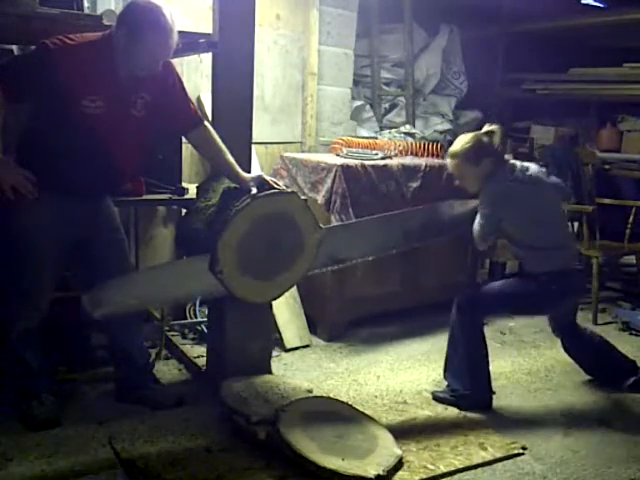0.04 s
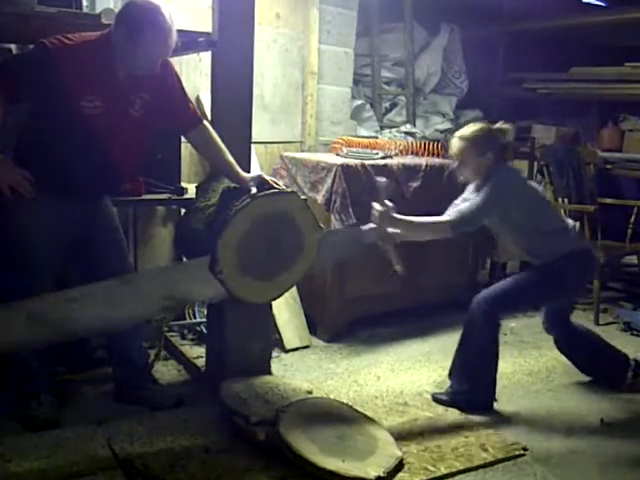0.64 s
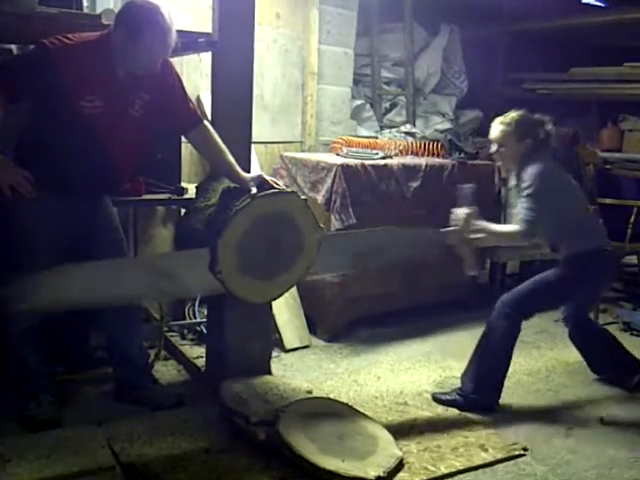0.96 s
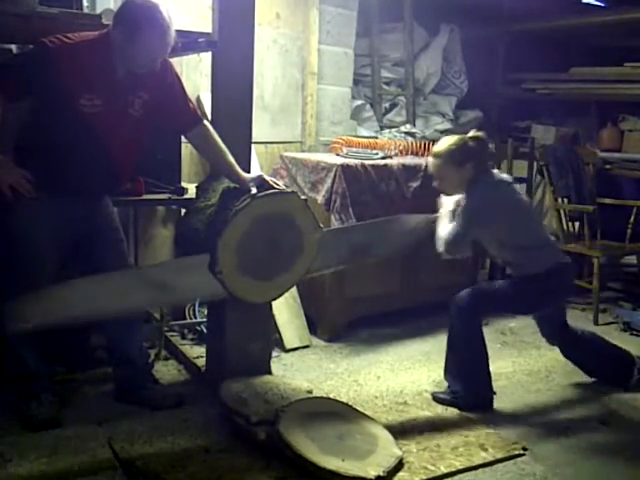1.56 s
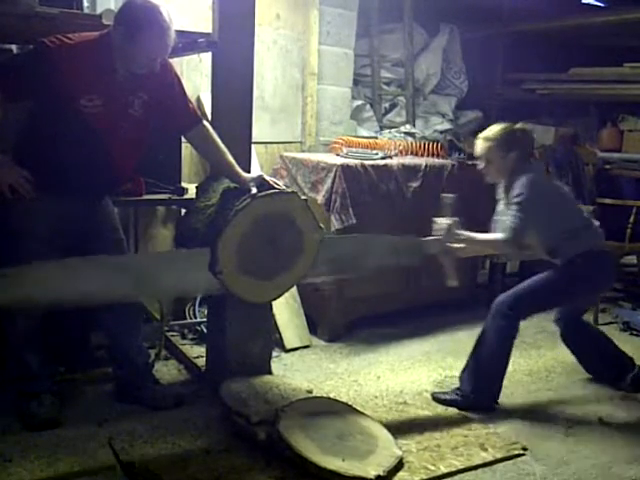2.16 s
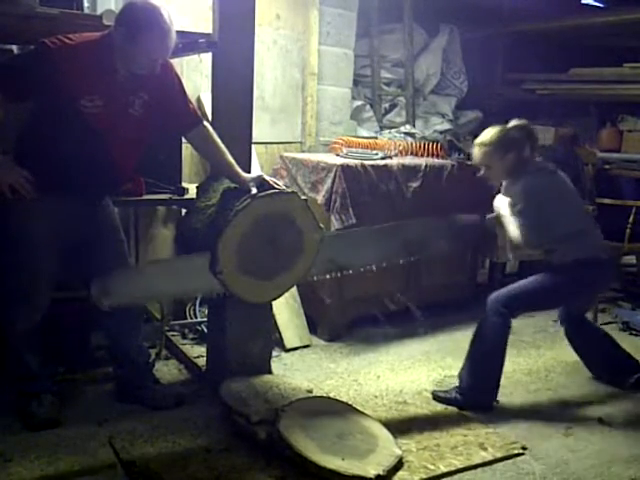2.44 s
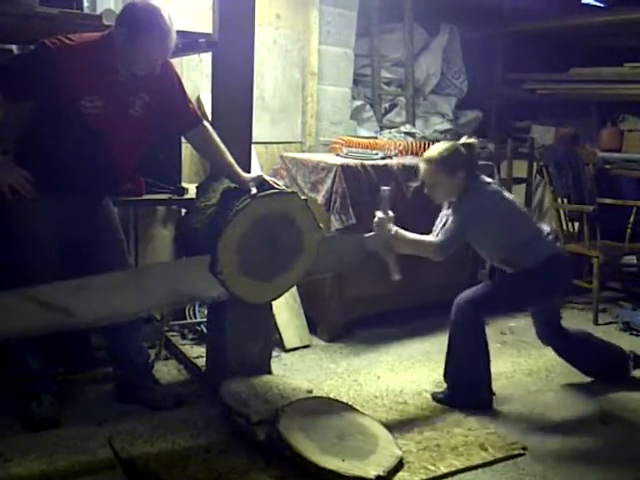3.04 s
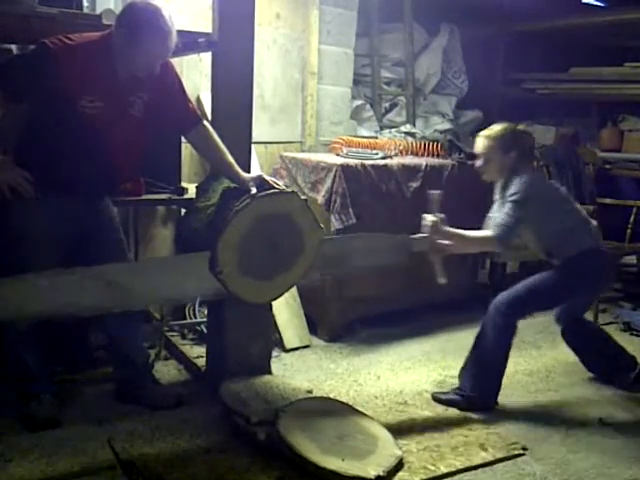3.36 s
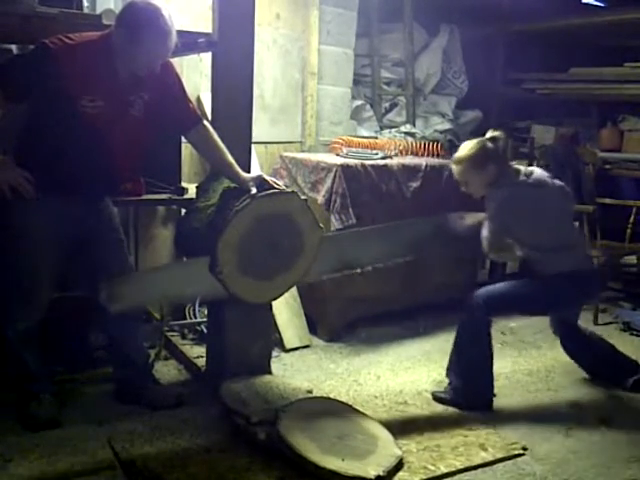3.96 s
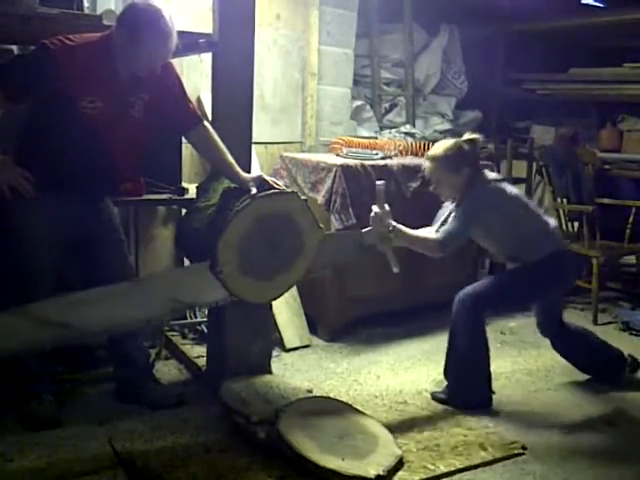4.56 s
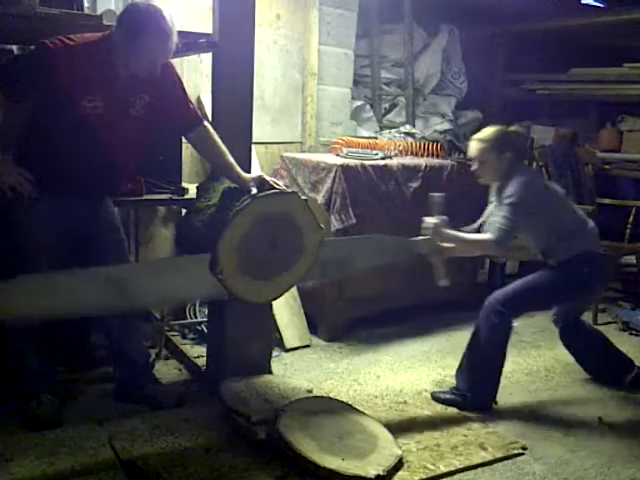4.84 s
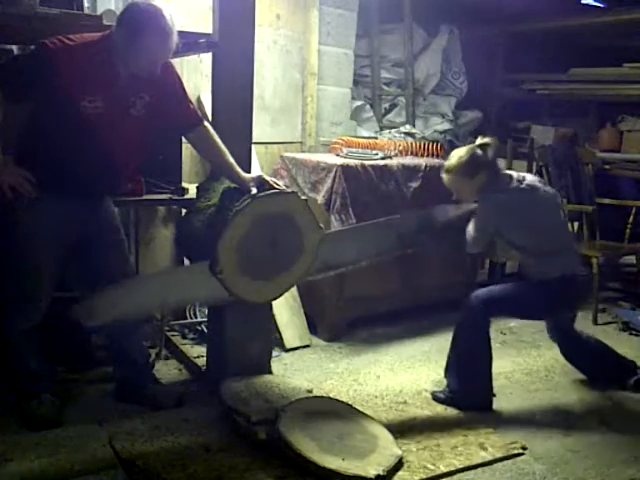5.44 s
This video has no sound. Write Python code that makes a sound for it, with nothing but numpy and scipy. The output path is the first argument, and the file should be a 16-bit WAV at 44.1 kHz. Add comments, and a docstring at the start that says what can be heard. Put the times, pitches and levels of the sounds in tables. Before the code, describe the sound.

A long hand saw rasps back and forth through a log in eight steady strokes inside a workshop.

```python
"""Crosscut saw in a workshop

A long saw is pushed and pulled through a log, eight strokes. Each time the blade speeds up, skates
lightly, then bites in and tears fibres until it slows to turn round. A floor reflection and a few ringing
tones colour the rasp, which surges mid-stroke. Now and then a thick fibre snaps, the log groans, the loose
blade sings or the stand shudders; the blade rattles in the kerf at the end. A faint hum lies under it."""
import sys
import numpy as np
from scipy import signal
from scipy.fft import rfft, irfft
from scipy.io import wavfile
from scipy.ndimage import uniform_filter1d

SR = 44100
rng = np.random.default_rng(int(sys.argv[2]) if len(sys.argv) > 2 else 0)


def pcm_store(signal):
    """Save signal as 16-bit PCM."""
    levels = np.round(np.clip(np.atleast_2d(signal), -1, 1) * 32767)
    wavfile.write(sys.argv[1], SR, levels.astype(np.int16).T)


N = 242550
TIME = np.arange(N) / SR

# push and pull in turn: start/s, end/s, speed-up/s, slow-down/s, bite time/s, cutting force/dB,
# skating force relative to cutting/dB, load on the log as bass gain/dB
STROKES = [(0.03, 0.87, 0.2, 0.39, 0.27, -24.2, -4.1, -15.5),
           (0.84, 1.43, 0.11, 0.28, 1.0, -20.8, -5.7, -20.2),
           (1.4, 2.13, 0.22, 0.21, 1.58, -26.5, -2.3, -16.8),
           (2.11, 2.66, 0.12, 0.3, 2.31, -21.2, -2.2, -18.3),
           (2.71, 3.33, 0.15, 0.26, 2.87, -22.4, -3.7, -18.7),
           (3.36, 3.99, 0.08, 0.22, 3.51, -23.8, -3.6, -17.5),
           (3.93, 4.85, 0.31, 0.47, 4.27, -24.7, -3.5, -16.9),
           (4.82, 5.4, 0.1, 0.31, 4.98, -19.0, -6.6, -19.1)]
# short changes in loudness and hiss during a stroke, mostly surges, one brief bright dip:
# middle/s, length/s, gain/dB, hiss gain/dB
STROKE_ACCENTS = [(0.648,0.42,5,2.5), (1.028,0.073,-3,3.5), (1.14,0.095,0.5,1.8), (1.67,0.14,3,2.8),
                  (1.874,0.58,5.5,-0.2), (2.288,0.089,4.5,2.8), (2.42,0.06,3,-0.8), (3.082,0.16,0.8,3.5),
                  (3.758,0.46,4.5,-1), (4.362,0.23,3,1.6), (4.613,0.42,7.5,1.2)]
# EQ of tearing wood: f/Hz, gain/dB
RASP_EQ = [(60, -22), (200, -22), (330, -11.5), (480, -13), (740, -9), (950, -6.5), (1600, -4), (2400, 1.5),
           (3200, 1), (3850, 1.5), (4500, -3), (5400, -4.5), (7050, -7.5), (8000, -20.5)]
# broad, evenly spaced peaks of a floor reflection, plus a few narrow ringing tones:
# f/Hz, width/Hz, relative level/dB
RASP_PEAKS = [(535, 84, 6.5), (870, 8.8, -4), (929, 74, -5), (994, 25, -4.5), (1156, 40, -2), (1412, 62, 2),
              (1820, 50, -3.5), (2410, 12, -6.5), (3504, 19, -9)]
# thick fibres break: t/s, dry peak level/dB
FIBRE_SNAPS = [(1.170, -11), (1.197, -16.5), (2.431, -12), (3.772, -10.5)]
# the blade knocks in the kerf after the last stroke: t/s, dry peak level/dB
KERF_KNOCKS = [(5.469, -24), (5.472, -22), (5.481, -22.5), (5.486, -25), (5.494, -27)]
# ring of one knock: f/Hz, relative level/dB, t60/s
KNOCK_MODES = [(540, -7, 0.3), (1040, -7, 0.073), (1390, -2, 0.083), (1880, -8, .02), (2120, 11, 0.023),
               (2660, 10, 0.027), (3080, -8, .02)]
# log and blade sing under the teeth: middle/s, length/s, f/Hz, level/dB
GROAN_NOTES = [(0.548, 0.078, 525, -31), (0.646, 0.083, 570, -38), (0.757, 0.38, 371, -51.5),
               (1.947, 0.25, 261, -52.5), (2.059, 0.67, 371.5, -50), (2.384, 0.27, 551, -40.5),
               (3.657, 0.07, 425, -36.5), (3.66, 0.093, 531, -38), (4.519, 0.1, 521, -39),
               (5.075, 0.34, 532, -41)]
# the stand shudders: middle/s, length/s, level/dB
STAND_SHUDDERS = [(0.339, 0.25, -46), (1.198, 0.23, -60)]
# EQ of the stand's rumble: f/Hz, gain/dB
STAND_EQ = [(10, -23.5), (22, 1), (40, -8), (150, -2.5), (310, 4), (450, -2), (800, -20), (3000, -73)]
# EQ of the room tone: f/Hz, gain/dB
ROOM_TONE_EQ = [(10, -27), (34, -9.5), (50, -1), (90, -10), (135, -0.5), (200, -4.5), (500, -8),
                (2000, -5.5), (7000, -25)]
# reverb time of the workshop: f/Hz, t60/s
ROOM_DECAY = [(150, 1), (600, 0.088), (2500, 0.49), (7000, 0.44)]

BITE_IN_S = 0.0046  # time constant of the change from skating to cutting
FRESH_S, FRESH_HISS_DB = 0.092, 1.3  # a fresh bite is brighter, then the gullets fill with dust
HISS_SLOW_DB, BASS_SLOW_DB = -4, 3.1  # a blade near rest sounds duller and heavier
BASS_PER_ACCENT = -0.52  # dB of bass share per dB of accent: the bass follows an accent only in part
TURN_DB, TURN_SPEED = -40, .25  # floors of force and speed: the blade still shifts as it turns round


def sawing(log_hz=700, wood_hz=2300, hiss_hz=4500,
           log_db=-4.5, wood_db=-9.5, steel_db=-7.5, hiss_db=-9.0):
    """The cut in four bands: force sets the loudness, a sharp bite adds hiss, load adds the log's bass."""
    speed, force_db, bite_db, load_db = arm_motion()
    cut = coloured_rasp(wood_grain(teeth(speed)))
    below = lambda hz: signal.sosfiltfilt(signal.butter(4, hz, fs=SR, output="sos"), cut)
    log = amp(log_db + load_db) * unit(below(log_hz))
    wood = amp(wood_db) * unit(below(wood_hz) - below(log_hz))
    steel = amp(steel_db) * unit(below(hiss_hz) - below(wood_hz))
    hiss = amp(hiss_db + bite_db) * unit(cut - below(hiss_hz))
    return amp(force_db) * (log + wood + steel + hiss)


def arm_motion():
    """Each stroke speeds up, skates, bites in and slows: envelopes for speed, force, hiss and bass."""
    speed, drag, fresh = np.zeros((3, N))
    for start, end, rise, slow, bite_at, cut_db, skate_db, _ in STROKES:
        motion = ease((TIME - start) / rise) * ease((end - TIME) / slow)
        cutting = .5 + .5 * np.tanh((TIME - bite_at) / BITE_IN_S)
        speed += motion
        drag += motion * amp(cut_db + skate_db * (1 - cutting))
        fresh += motion * cutting * np.exp(-np.maximum(TIME - bite_at, 0) / FRESH_S)
    speed = np.clip(speed, TURN_SPEED, 1)
    accent_db, sharp_db = sum(np.outer(gains_db, swell(middle, length))
                              for middle, length, *gains_db in STROKE_ACCENTS)
    force_db = 20 * np.log10(np.hypot(drag * amp(accent_db), amp(TURN_DB)))
    bite_db = sharp_db + FRESH_HISS_DB * fresh + HISS_SLOW_DB * (1 - speed)
    middles = [(start + end) / 2 for start, end, *_ in STROKES]
    stroke_load_db = np.interp(TIME, middles, [stroke[-1] for stroke in STROKES])
    load_db = stroke_load_db + BASS_SLOW_DB * (1 - speed) + BASS_PER_ACCENT * accent_db
    return speed, force_db, bite_db, load_db


def teeth(speed, teeth_per_s=120, uneven=.3, release_teeth=5.1, tooth_db=0.27,
          fibres_per_s=11000, fibre_db=1.16):
    """Each passing tooth tears a clump of fibres; the side of the blade rubs smoothly."""
    passed = np.cumsum(teeth_per_s * speed * np.exp(uneven * wander(60))) / SR
    depth = amp(tooth_db * rng.standard_normal(N))[passed.astype(int) % N]  # each tooth has its own
    grip = depth * np.exp(-(passed % 1) / release_teeth)  # a tooth catches at once and lets go slowly
    size = amp(fibre_db * np.minimum(rng.exponential(1, N), 4)) * rng.choice([-1, 1], N)
    torn = rng.random(N) < fibres_per_s * speed / SR
    fibres = size * torn / speed ** 0.42  # slow teeth tear fewer, coarser fibres
    rub = rng.standard_normal(N)
    return unit(grip * (unit(fibres) + rub))


def wood_grain(tearing, stretch_db=1.02, chip_db=1.0):
    """Each stretch of wood and each chip tears with a colour of its own."""
    spectrum = signal.stft(tearing, nperseg=256, noverlap=192)[2]

    def patches(bins, frames):
        noise = rng.standard_normal(spectrum.shape)
        return unit(uniform_filter1d(uniform_filter1d(noise, bins, 0), frames, 1))

    grain_db = stretch_db * patches(bins=5, frames=50) + chip_db * patches(bins=2, frames=7)
    return signal.istft(spectrum * amp(grain_db), nperseg=256, noverlap=192)[1][:N]


def coloured_rasp(tearing, peak_trim_db=-2.5):
    """A woody rasp, coloured by the broad peaks of a floor reflection and a few narrow ringing tones."""
    rasp = colour(tearing, RASP_EQ)
    peaks = sum(amp(db + peak_trim_db) * resonate(rasp, hz, width) for hz, width, db in RASP_PEAKS)
    return rasp + peaks


def fibre_snaps(decay_s=0.0011, band_hz=(1500, 4800)):
    """A thick fibre breaks with one short, bright crack."""
    out, t = np.zeros(N), np.arange(256) / SR
    band_pass = signal.butter(3, band_hz, "band", fs=SR, output="sos")
    for at, db in FIBRE_SNAPS:
        burst = rng.standard_normal(len(t)) * np.exp(-t / decay_s)
        crack = signal.sosfiltfilt(band_pass, np.pad(burst, 32))
        add(out, at - .001, amp(db) * crack / abs(crack).max())
    return out


def blade_knocks():
    """The blade rattles against the walls of the kerf, each knock tuned a little differently."""
    out, t = np.zeros(N), np.arange(SR // 5) / SR
    for at, db in KERF_KNOCKS:
        ring = sum(amp(mode_db - 60 * t / t60) * np.sin(2 * np.pi * hz * rng.uniform(0.94, 1.03) * t)
                   for hz, mode_db, t60 in KNOCK_MODES)
        add(out, at, amp(db) * ring / abs(ring).max())
    return out


def groans(pitch_waver=0.02015, rough_db=3):
    """Stick and slip feed one low mode of log or blade for a moment: a rough, wavering note."""
    out = np.zeros(N)
    for middle, length, hz, db in GROAN_NOTES:
        cycles = np.cumsum(hz * (1 + pitch_waver * wander(68.4))) / SR
        envelope = amp(db + rough_db * np.tanh(wander(70))) * swell(middle, length)
        out += envelope * np.sin(2 * np.pi * cycles)
    return out


def stand_rumble():
    """The log's stand rumbles when the saw drags at it."""
    envelope = sum(amp(db) * swell(middle, length) for middle, length, db in STAND_SHUDDERS)
    return envelope * unit(colour(rng.standard_normal(N), STAND_EQ))


def workshop_reverb(direct, wet_db=-9.5, drift_hz=4, paths=8):
    """The blade keeps moving, so its sound crossfades between echo paths through the room."""
    sends = np.array([wander(drift_hz) for _ in range(paths)])
    sends /= np.linalg.norm(sends, axis=0)  # constant total power
    wet = sum(signal.fftconvolve(direct * send, reflections())[:N] for send in sends)
    return (direct + amp(wet_db) * wet) / np.hypot(1, amp(wet_db))


def reflections(echoes_per_s=3000):
    """A half-second tail of sparse echoes, each band dying at its own speed."""
    length = SR // 2
    echoes = rng.choice([-1., 1.], length) * (rng.random(length) < echoes_per_s / SR)
    hz, t, spectrum = signal.stft(echoes, SR, nperseg=256)
    decay = amp(-60 * t / curve_at(ROOM_DECAY, hz)[:, None])
    tail = signal.istft(spectrum * decay, SR, nperseg=256)[1]
    return tail / np.linalg.norm(tail)


def room_tone(air_db=-56, hum_hz=119.0, hum_db=-66, waver_db=4.0):
    """A bed of soft air and a faint hum that wavers in pitch and level."""
    hum = np.sin(2 * np.pi * np.cumsum(hum_hz + 4 * wander(9.6)) / SR)
    air = unit(colour(rng.standard_normal(N), ROOM_TONE_EQ))
    return amp(air_db) * air + amp(hum_db + waver_db * wander(5.5)) * hum


def amp(db):
    """Decibels to gain."""
    return 10 ** (np.asarray(db) / 20)


def unit(x):
    """Scales to rms 1."""
    return x / np.sqrt(np.mean(x ** 2) + 1e-20)


def add(mix, at, sound):
    """Lays a sound into the mix, `at` seconds in."""
    part = mix[max(round(at * SR), 0):][:len(sound)]
    part += sound[:len(part)]


def curve_at(points, hz):
    """Reads a curve on a log-frequency axis."""
    f, value = np.transpose(points)
    return np.interp(np.log(hz + 1), np.log(f + 1), value)


def colour(x, eq):
    """Applies an EQ curve."""
    gain = amp(curve_at(eq, np.fft.rfftfreq(2 * N, 1 / SR)))
    return irfft(rfft(x, 2 * N) * gain)[:N]


def resonate(x, hz, width_hz):
    """A band-pass with a peak gain of 1."""
    return signal.lfilter(*signal.iirpeak(hz, hz / width_hz, fs=SR), x)


def wander(rate_hz):
    """Smooth random modulation of rms 1, rolling off above rate_hz."""
    hz = np.fft.rfftfreq(N, 1 / SR)
    return unit(irfft(rfft(rng.standard_normal(N)) * np.exp(-(hz / rate_hz) ** 2), N))


def swell(middle, length):
    """One smooth rise and fall."""
    return np.cos(np.pi * np.clip((TIME - middle) / length, -.5, .5)) ** 2


def ease(progress):
    """A quarter-sine fade from rest (0) to full (1)."""
    return np.sin(np.pi / 2 * np.clip(progress, 0, 1))


def scene():
    """Saw, snaps and knocks go through the reverb; the other layers stay dry. Mono on both channels."""
    saw = workshop_reverb(sawing() + fibre_snaps() + blade_knocks())
    mono = saw + groans() + stand_rumble() + room_tone()
    return np.array([mono, mono])


def record(dry, cutoff_hz=7760):
    """A steep low-pass takes the top off the whole mix."""
    low_pass = signal.firwin(221, cutoff_hz, window=("kaiser", 8), fs=SR)
    return signal.oaconvolve(dry, low_pass[None], "same")


dry = scene()
out = record(dry)
pcm_store(out)
```